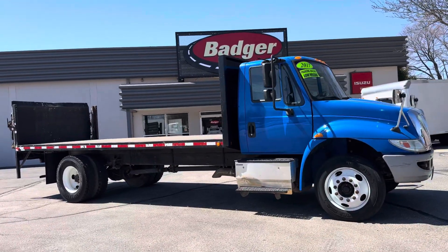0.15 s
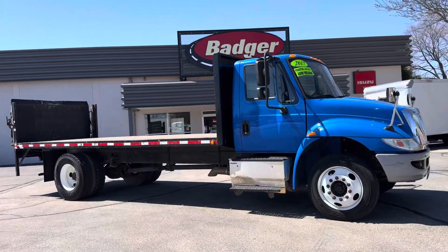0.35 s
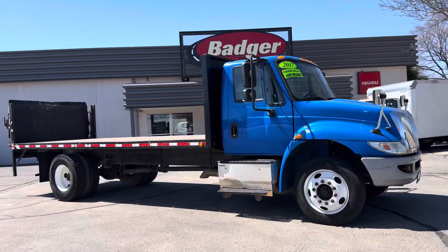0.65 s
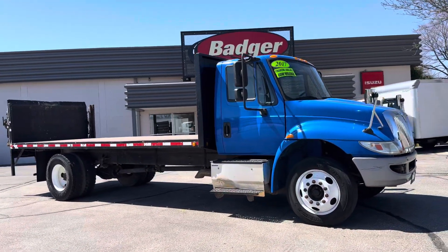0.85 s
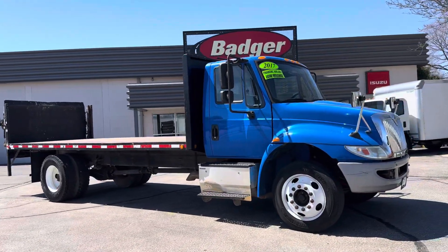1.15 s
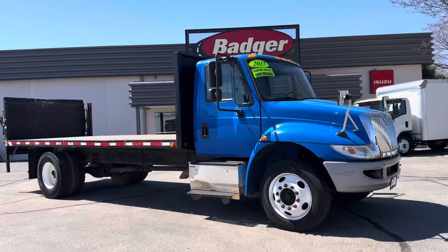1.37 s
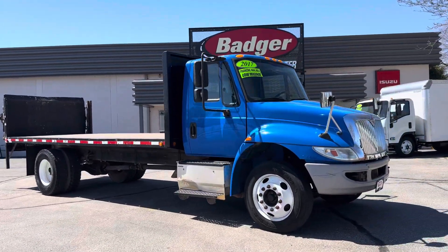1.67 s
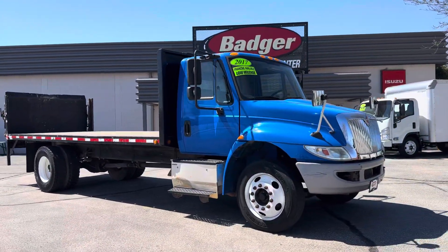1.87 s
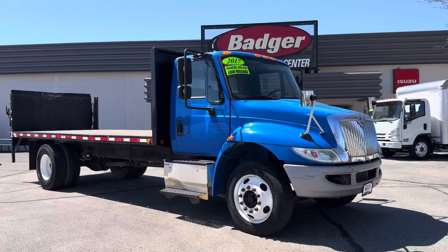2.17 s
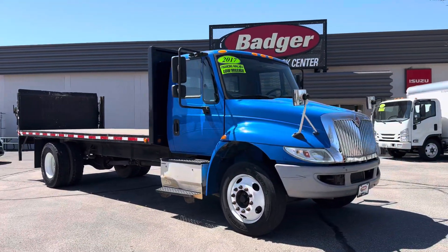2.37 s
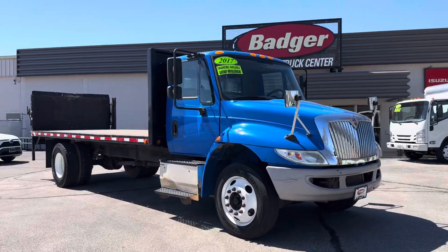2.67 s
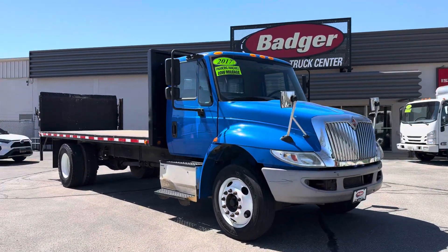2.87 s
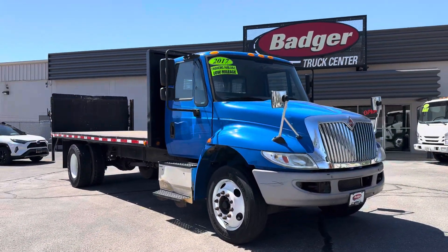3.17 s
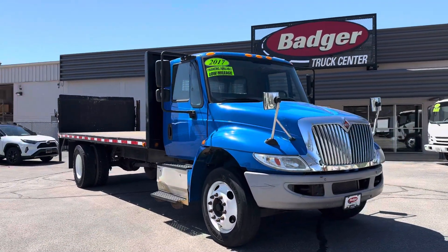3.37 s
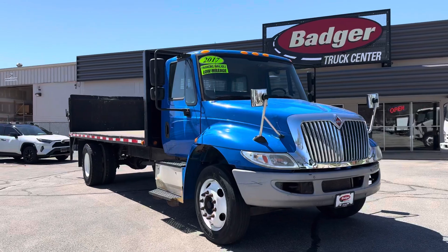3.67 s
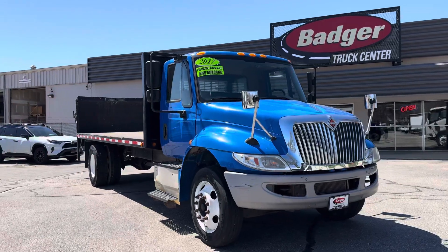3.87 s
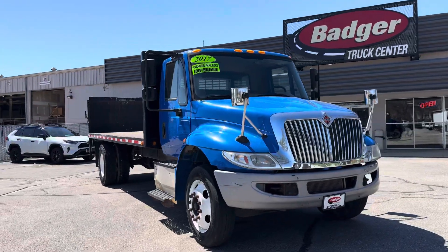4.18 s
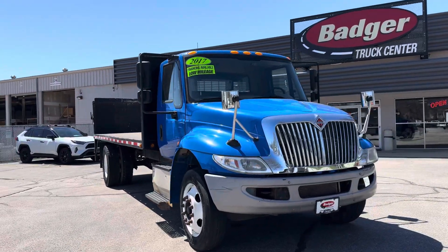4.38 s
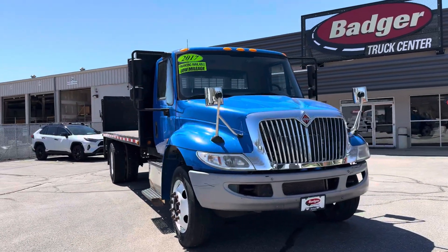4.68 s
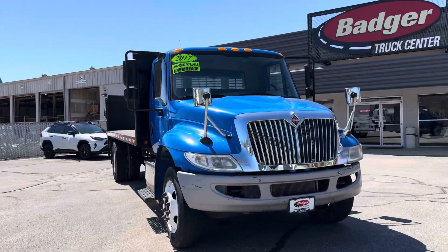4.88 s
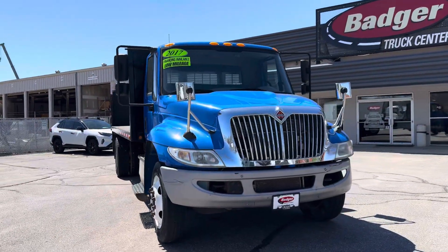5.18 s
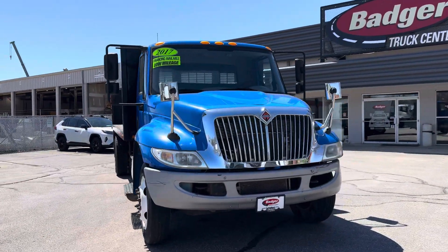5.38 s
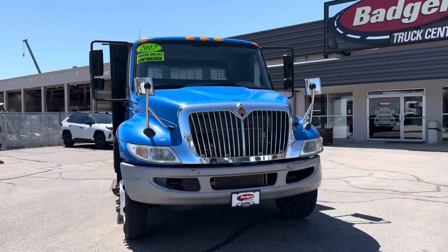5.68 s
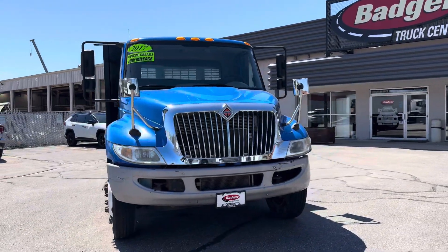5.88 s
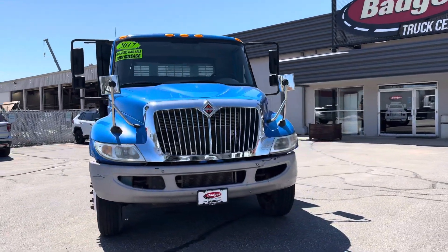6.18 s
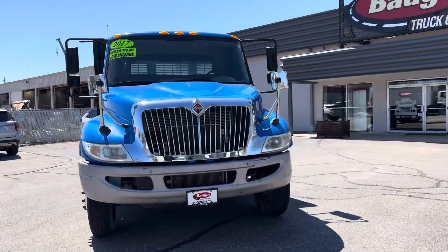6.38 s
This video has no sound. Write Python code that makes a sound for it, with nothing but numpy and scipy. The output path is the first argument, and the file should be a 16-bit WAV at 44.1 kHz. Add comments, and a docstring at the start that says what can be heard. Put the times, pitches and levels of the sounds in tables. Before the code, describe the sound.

A heavy six-cylinder diesel idles at a constant slow speed on an open paved lot. Fast uneven clatter, ringing metal knocks and a steady airy rush run throughout. A handheld phone moves from beside the cab to the grille, so the engine grows louder and brighter. Wind rumbles and thumps on the microphone, strongest between one and two seconds, then mostly eases.

```python
"""Idling diesel truck, walked round by hand

A six-cylinder diesel truck idles on an open lot while a hand-held phone walks from beside the cab to the grille.
Each firing rings decaying modes of the block and sets off bursts of shaped noise, the clatter; air rushes on.
One cylinder adds a heavy hollow knock of two rings; gears whine as thin sines and a low sine with its octave hums.
Wind is coloured noise that rumbles and rustles; buffets are short low swings on the phone's two microphone ports.
"""
import sys
import numpy as np
from scipy import signal
from scipy.fft import rfft, irfft
from scipy.io import wavfile
from scipy.ndimage import uniform_filter1d

SR = 44100
rng = np.random.default_rng(int(sys.argv[2]) if len(sys.argv) > 2 else 0)


def store_wav(level_fs):
    """Save 16-bit WAV to argv[1]."""
    pcm = np.round(np.clip(np.atleast_2d(level_fs), -1, 1) * 32767)
    wavfile.write(sys.argv[1], SR, pcm.T.astype(np.int16))


N = 288414
T = np.arange(N) / SR
FREQ = np.maximum(np.fft.rfftfreq(N, 1 / SR), 1)


def undb(db):
    """Turn dB into gain."""
    return 10 ** (np.asarray(db) / 20)


def level(x, db):
    """Set the rms level."""
    return x * undb(db) / np.sqrt(np.mean(x ** 2))


def curves(table):
    """Join each column of a timed table into one value a sample."""
    s, *columns = np.transpose(table)
    return [np.interp(T, s, column) for column in columns]


def over_hz(hz, values):
    """Join values along a log-frequency axis."""
    return np.interp(np.log(FREQ), np.log(hz), values)


def colour(x, spectrum):
    """Filter by points of frequency and dB."""
    return irfft(rfft(x) * undb(over_hz(*np.transpose(spectrum))), N)


def ring(x, hz, t60):
    """Excite one mode, a complex resonator that falls 60 dB in t60 seconds."""
    pole = np.exp(2j * np.pi * hz / SR - np.log(1000) / (t60 * SR))
    return signal.lfilter([1], [1, -pole], x)


def walk(rate):
    """Hold random levels for 1 / rate s and slew them twice; their spread is near 0.5."""
    k = int(SR / rate)
    held = np.repeat(rng.standard_normal(N // k + 1), k)
    return 0.7 * uniform_filter1d(uniform_filter1d(held, k), k)[:N]


# when the phone is beside the cab, at the front corner and facing the grille: [s]
VIEW_S = (0.35, 3.7, 6.15)


def along_walk(values):
    """Glide between the values for the three places of the phone."""
    return np.interp(T, VIEW_S, values)


CYCLE_HZ = 6.26  # all six cylinders fire once (about 750 rpm)
# the blows arrive sooner as the phone nears the engine: lead_s at each of the three places
FIRING_LEAD_S = (0.001946, 0.002528, .003)


def firings():
    """Count evenly spaced firings: number of each, its cylinder, and the seconds since it began."""
    firing_hz = CYCLE_HZ * 6
    firing = (T + along_walk(FIRING_LEAD_S)) * firing_hz
    number = firing.astype(int)
    return number, number % 6, firing % 1 / firing_hz


# modes of block and panels: pitch_hz, t60_s, then level_db for each of the six cylinders in firing order
BLOCK_MODES = [(320.6, 0.29, -22.5, -27, -3.5, -12, -20.5, -1),
               (679.6, 0.12, -9.5, -12.5, -10, -9.5, -7.5, -10.5),
               (825.2, 0.078, 0.5, 5, 7.5, 1, -15.5, 6.5), (892.5, 0.1, -10.5, -0.5, -19.5, -4.5, -7.5, -8),
               (1267.4, 0.06, -16, -6.5, -6, -2, 1, -6), (1389, 0.065, -10, -17, -14, 3.5, -4, -1),
               (1470, 0.057, -1, -11, -13, -8, -5, 3.5), (1540, 0.044, -0.5, -16, -14, -9, -10, -2.5),
               (1828, 0.052, -6.5, -15.5, -14, -14, -11, -6.5),
               (2058, 0.07, 0.5, -4.5, -25, 4, -11.5, -15.5), (2136, 0.03, -2, 6.5, -33, -16.5, 0, -13),
               (2245, 0.013, -9, 3, -29, 8, -16, 5), (2655, 0.029, -1.5, -2.5, -3.5, -3.5, 2, -7.5),
               (2808, 0.017, -0.5, 3, -10, -1, -5.5, 3.5),
               (3346, 0.0078, -19.5, -24, -15.5, -11.5, -21.5, -20.5),
               (4336, 0.025, -25.5, -13.5, -17.5, -18, -20, -12.5),
               (4670, 0.044, -16.5, -11.5, -14, -21.5, -22.5, -14.5),
               (4750, 0.048, -15.5, -10, -13, -21.5, -15, -14),
               (6355, 0.011, -12.5, -20.5, -17, -14.5, -21, -19)]
# the last cylinder's blow as heard on the walk: level_db at each of the three places
LAST_CYLINDER_VIEW_DB = (1, -2, 0.5)
# knocks against the rest of the engine: level_db at each of the three places
KNOCK_VIEW_DB = (-3, -2, -2.5)
KNOCK_RISE_S = 0.022  # t60 of the push that excites each mode
KNOCK_SCATTER_DB, KNOCK_SMEAR = 1.2, 0.22  # shot-to-shot spread of level, and of phase in rad
KNOCK_DETUNE = 0.004  # share of pitch each shot strays, up to 2 kHz; thin high parts stray more
PATH_DRIFT_DB = -0.6  # depth of the slow swell and fade of each mode as the listener changes place
GROUND_ECHO_S, GROUND_ECHO_DB = 0.0055, -6
KNOCK_DB, RATTLE_DB = -35.5, -46  # balance within the engine


def knocks_and_rattle():
    """Firings knock the block's modes; noise keeps loose parts murmuring on the same modes between firings."""
    number, cylinder, since = firings()
    start = np.diff(number, prepend=-1) > 0
    start = start * undb((cylinder == 5) * along_walk(LAST_CYLINDER_VIEW_DB))
    knock = rattle = 0
    for hz, t60, *db in BLOCK_MODES:
        # each cylinder reaches the mode by its own path; combustion varies from shot to shot
        path = np.exp(2j * np.pi * rng.random(6))
        size, turn, stray = rng.standard_normal((number[-1] + 1, 3)).T
        shot = undb(KNOCK_SCATTER_DB * size) * np.exp(1j * KNOCK_SMEAR * turn)
        hit = start * shot[number] * (path * undb(db))[cylinder]
        blow = ring(hit, hz, KNOCK_RISE_S)  # pressure builds, no click
        stray_hz = KNOCK_DETUNE * max(hz / 2000, 1) ** 2 * hz * stray[number]
        detune = np.exp(2j * np.pi * stray_hz * since)
        drift = undb(PATH_DRIFT_DB * walk(0.62))
        knock = knock + drift * (ring(blow, hz, t60) * detune).imag
        murmur = ring(rng.standard_normal(N), hz, t60).imag
        rattle = rattle + drift * undb(np.mean(db)) * murmur
    echo = np.interp(T - GROUND_ECHO_S, T, knock)  # again via the asphalt
    knock = knock + undb(GROUND_ECHO_DB) * echo
    return undb(along_walk(KNOCK_VIEW_DB)) * level(knock, KNOCK_DB) + level(rattle, RATTLE_DB)


def shot_levels(cylinder_db, scatter_db):
    """Give each firing its cylinder's gain and a random scatter."""
    number, cylinder, _ = firings()
    scatter = undb(scatter_db * rng.standard_normal(number[-1] + 1))
    return undb(cylinder_db)[cylinder] * scatter[number]


# valve and injector clatter, relative noise spectrum: frequency_hz, density_db
CLATTER_SPECTRUM = [(200, -16.5), (400, -3), (570, -8.5), (800, -3), (1400, -8.5), (2200, -11),
                    (2900, -17.5), (3650, -26), (4700, -14), (5600, -25), (6500, -31.5), (9000, -29),
                    (11500, -25), (15000, -27.5)]
# clatter below the valve train, in firing order: level_db
CLATTER_CYLINDER_DB = [2, 5, 4.5, 2, 1.5, 5.5]
# valve train above the knocks, with quieter cylinders, in firing order: level_db
VALVE_CYLINDER_DB = [0, 2.5, 2, -6, -2, 4]
# injector ticks in the far treble, in firing order: level_db
TICK_CYLINDER_DB = [0.5, -0.5, 3.5, -3, -6.5, 1]
VALVE_FROM_HZ, TICK_FROM_HZ = 3500, 9000
CLATTER_DECAY_S, TICK_DECAY_S = 0.026, 0.014  # time constants
VALVE_RISE_S = 0.007  # time scale of the build and the fade
VALVE_DB, TICK_DB = -4, 1  # against the low clatter, before colouring
CLATTER_DB = -37  # balance within the engine


def clatter():
    """Each firing opens noise in three bands: low clatter and ticks fade, the valve train builds for a moment."""
    _, _, since = firings()
    burst = shot_levels(CLATTER_CYLINDER_DB, 0.34) * np.exp(-since / CLATTER_DECAY_S)
    burst = uniform_filter1d(burst, size=330)
    tick = undb(TICK_DB) * shot_levels(TICK_CYLINDER_DB, 1.5) * np.exp(-since / TICK_DECAY_S)
    tick = uniform_filter1d(tick, size=300)
    u = since / VALVE_RISE_S
    valve = undb(VALVE_DB) * shot_levels(VALVE_CYLINDER_DB, 2.03) * (0.13 + u) * np.exp(0.65 - u)
    valve = uniform_filter1d(valve, size=100)
    low, high = FREQ < VALVE_FROM_HZ, FREQ > TICK_FROM_HZ
    noise = rfft(burst * rng.standard_normal(N)) * low
    noise = noise + rfft(valve * rng.standard_normal(N)) * ~(low | high)
    noise = noise + rfft(tick * rng.standard_normal(N)) * high
    return level(colour(irfft(noise, N), CLATTER_SPECTRUM), CLATTER_DB)


# rush against the clatter spectrum: frequency_hz, level_db
RUSH_TILT = [(900, 2.5), (2100, -2), (4500, -8), (12000, -5)]
RUSH_DB = -34.5  # balance within the engine


def rush():
    """Fan and intake air is steady turbulence: noise with a slight waver."""
    air = undb(0.16 * walk(5.3)) * rng.standard_normal(N)
    return level(colour(colour(air, CLATTER_SPECTRUM), RUSH_TILT), RUSH_DB)


def engine():
    """Sum the struck metal, the clatter and the moving air."""
    return knocks_and_rattle() + clatter() + rush()


# engine by region: low_hz, high_hz, then level_db before the ports beside the cab, at the corner, at the grille
VIEWS = [(341, 547, -48.5, -38, -34.5), (645, 1065, -42, -39.5, -39.5), (1100, 1325, -44, -38.5, -37),
         (1358, 1790, -49, -40.5, -39.5), (1710, 2270, -44.5, -39.5, -39), (2300, 4270, -45, -42, -42.5),
         (3340, 4340, -52.5, -48, -45.5), (4160, 5300, -50.5, -46, -42.5), (5380, 7740, -51, -45.5, -45.5),
         (11640, 13700, -56, -52.5, -49)]
REGION_FLICKER_DB, REGION_GRAIN_DB = 1.02, 1.2  # depth of slower and quicker unevenness, own to each region


def walked(x):
    """Cab, wheel arch and grille let different regions through as the listener moves round."""
    spectrum, out = rfft(x), 0
    centres = [np.sqrt(low * high) for low, high, *_ in VIEWS]
    for (low, high, *db), one in zip(VIEWS, np.eye(len(centres))):
        inside = np.std(irfft(spectrum * (FREQ > low) * (FREQ < high), N))
        region_db = along_walk(db) + REGION_FLICKER_DB * walk(10) + REGION_GRAIN_DB * walk(50)
        region = irfft(spectrum * over_hz(centres, one), N)  # overlaps its neighbours
        out = out + undb(region_db) / inside * region
    return out


# heavy knock of the last cylinder: time_s, level_db, pitch_hz
HEAVY_KNOCK = [(0.0, -35, 1350), (1.2, -36.5, 1410), (1.75, -24.5, 1300), (2.2, -26.5, 1374),
               (2.7, -30.5, 1400), (3.0, -28.5, 1530), (3.9, -28.5, 1460), (4.4, -25, 1390),
               (5.0, -26, 1470), (5.3, -27.5, 1364), (5.7, -22, 1410), (5.95, -19.5, 1390),
               (6.54, -23, 1397)]
# the lower ring against the upper: level_db at each of the three places
HEAVY_LOWER_DB = (-3.5, -4, 1)
HEAVY_RISE_S, HEAVY_SPLIT_HZ = 0.0046, 90  # rings lie this far above and below the pitch
HEAVY_SCATTER_DB, HEAVY_STRAY = 0.5, 0.01  # shot to shot; stray is a share of pitch


def heavy_knock():
    """Once a cycle one short, hollow double ring stands out; its pitch strays a little."""
    number, cylinder, since = firings()
    db, hz = curves(HEAVY_KNOCK)
    size, stray, turn = rng.standard_normal((number[-1] + 1, 3)).T
    u = since / HEAVY_RISE_S
    shape = (cylinder == 5) * (u * np.exp(1 - u)) ** 2
    turns = hz * (1 + HEAVY_STRAY * stray[number]) * since + turn[number]
    upper = np.sin(2 * np.pi * (turns + HEAVY_SPLIT_HZ * since))
    lower = np.sin(2 * np.pi * (turns - HEAVY_SPLIT_HZ * (since - HEAVY_RISE_S)))
    swing = upper + undb(along_walk(HEAVY_LOWER_DB)) * lower
    return undb(db + HEAVY_SCATTER_DB * size[number]) * shape * swing / np.sqrt(2)


# gear and pump tones: pitch_hz, then rms level_db at each of the times below
WHINES = [(306, -48, -52, -44.5, -51, -50.5), (679.4, -59, -54.5, -61, -48, -57),
          (801, -52.5, -46.5, -65, -61.5, -44.5), (827.4, -55.5, -57, -53.5, -53, -43),
          (903, -47, -51, -58.5, -48, -43.5), (1234, -52.5, -52, -52.5, -44, -48.5),
          (1299, -52.5, -52.5, -62.5, -42, -57.5), (1838, -53, -58, -60, -47, -56.5),
          (2085, -59.5, -56.5, -46.5, -67, -65), (3400, -69.5, -62, -70, -63, -70)]
# times of the whine levels: [s]
WHINE_S = (.5, 1.6, 3.1, 4.4, 5.8)
WHINE_WAVER_DB, WHINE_WANDER_TURNS = 1.5, 0.16  # depths of level and phase wander


def whines():
    """Thin sine tones of gears and pumps come and go with the listener's place."""
    out = 0
    for hz, *db in WHINES:
        tone_db = np.interp(T, WHINE_S, db) + WHINE_WAVER_DB * walk(4.3)
        turns = hz * T + WHINE_WANDER_TURNS * walk(3.135) + rng.random()
        out = out + np.sqrt(2) * undb(tone_db) * np.sin(2 * np.pi * turns)
    return out


# low drone: time_s, rms level_db
HUM = [(0.0, -25.5), (0.33, -23.5), (0.38, -25.5), (0.54, -22), (1.07, -22), (1.11, -33.5), (1.15, -21),
       (1.42, -20.5), (1.51, -29.5), (2.13, -19.5), (2.26, -43.5), (2.33, -29.5), (2.39, -36.5),
       (2.88, -29.5), (2.93, -35.5), (3.11, -27.5), (3.35, -38), (3.48, -23.5), (3.57, -27), (3.7, -20),
       (3.77, -27), (3.86, -16.5), (3.93, -24.5), (4.0, -23.5), (4.08, -17.5), (4.15, -31), (4.43, -33),
       (4.48, -26.5), (4.86, -36.5), (4.97, -27.5), (5.01, -34.5), (5.57, -31.5), (5.79, -43.5),
       (5.81, -26.5), (6.03, -26.5), (6.08, -44.5), (6.21, -27.5), (6.25, -39), (6.43, -34.5),
       (6.54, -44.5)]
HUM_HZ, HUM_OCTAVE_DB = 124.6, -19.5
HUM_WAVER_DB, HUM_ROUGH_DB = 2, 1  # depths of slower and quicker level changes
HUM_WANDER_TURNS, HUM_FLUTTER_TURNS = 0.21, 0.09  # depths of slower and quicker phase wander


def hum():
    """A low tone with a faint octave wanders in pitch and wavers in level."""
    turns = HUM_HZ * T + HUM_WANDER_TURNS * walk(8) + HUM_FLUTTER_TURNS * walk(30) + rng.random()
    octave = np.sin(2 * 2 * np.pi * turns)
    tone = np.sin(2 * np.pi * turns) + undb(HUM_OCTAVE_DB) * octave
    tone_db = curves(HUM)[0] + HUM_WAVER_DB * walk(18) + HUM_ROUGH_DB * walk(45)
    return np.sqrt(2) * undb(tone_db) * tone


# wind on the ports: time_s, rumble level_db, flutter level_db
WIND = [(0.0, -27, -32), (0.49, -22, -27), (0.67, -28.5, -31), (0.71, -21, -25.5), (0.76, -26.5, -31),
        (0.89, -23, -28.5), (0.91, -24, -20), (0.95, -22.5, -26), (1.02, -24.5, -30.5), (1.04, -26, -26.5),
        (1.22, -18.5, -32.5), (1.29, -23, -30), (1.42, -19.5, -28), (1.46, -28.5, -32.5), (1.53, -23, -28),
        (1.58, -29, -35), (1.62, -26, -24.5), (1.66, -17.5, -20.5), (1.71, -22.5, -32.5), (1.75, -19, -12),
        (1.8, -21, -30.5), (1.86, -16, -20.5), (1.89, -16.5, -34.5), (1.93, -27.5, -33), (1.97, -21.5, -26),
        (2.04, -29, -25), (2.07, -15.5, -22), (2.22, -29.5, -30.5), (2.37, -25, -36.5),
        (2.46, -42.5, -33.5), (2.51, -31.5, -24), (2.55, -29.5, -35.5), (2.86, -28, -26.5),
        (3.2, -32.5, -37.5), (3.99, -30.5, -28), (4.1, -21.5, -27), (4.21, -31.5, -28.5),
        (4.48, -29.5, -36), (4.63, -25.5, -28.5), (4.66, -42.5, -28.5), (4.81, -23.5, -26.5),
        (4.84, -36, -30), (4.94, -30.5, -26), (4.97, -26, -34.5), (5.15, -40, -32.5), (5.28, -30, -35.5),
        (5.48, -30.5, -30), (6.14, -29.5, -30), (6.17, -27.5, -28.5), (6.52, -25.5, -29), (6.54, -18, -25)]
# four relative noise spectra of the wind, lowest layer first: frequency_hz, density_db
DEEP = [(20, -33), (35, -14), (50, -3), (65, 2), (85, -9.5), (150, -59), (300, -110)]
RUMBLE = [(25, -28), (40, -15), (55, 4.5), (100, 10), (150, 2), (220, -18), (300, -49), (600, -110)]
FLUTTER = [(60, -51), (100, -28), (140, 6.5), (200, 0), (280, -4.5), (350, -21), (700, -110)]
RUSTLE = [(100, -69.5), (200, -8), (280, 3), (450, -6.5), (580, -16), (800, -26), (1500, -110)]
CALM_DB = -31.5  # rumble or flutter level at which deep and rustle have their own calm levels
DEEP_CALM_DB, DEEP_FOLLOW = -47, 2.04  # follow: dB per dB of rumble
RUSTLE_CALM_DB, RUSTLE_FOLLOW = -37.5, 0.33  # follow: dB per dB of flutter
WIND_LUMP_DB, WIND_FLICKER_DB = 2.5, 1  # depths, shared by all layers and own to each


def wind():
    """Turbulence as noise: a deep thud follows the rumble, a thin rustle the flutter; all lumpy and flickering."""
    rumble_db, flutter_db = curves(WIND)
    deep_db = DEEP_CALM_DB + DEEP_FOLLOW * (rumble_db - CALM_DB)
    rustle_db = RUSTLE_CALM_DB + RUSTLE_FOLLOW * (flutter_db - CALM_DB)
    layers = ((rumble_db, RUMBLE), (deep_db, DEEP), (flutter_db, FLUTTER), (rustle_db, RUSTLE))
    lumps = walk(16)
    out = 0
    for db, spectrum in layers:
        gain = undb(db + WIND_LUMP_DB * lumps + WIND_FLICKER_DB * walk(25))
        out = out + gain * level(colour(rng.standard_normal(N), spectrum), 0)
    return out


# single buffets: start_s, level_db before the common gain, pitch_hz
BUFFETS = [(0.386, -20, 156), (0.7, -20.5, 143.8), (0.915, -13, 170), (1.025, -14.5, 144.6),
           (1.143, -15, 146.6), (1.403, -10.5, 142), (1.506, -22, 202), (1.654, -10.5, 171.9),
           (1.734, -14.5, 186), (1.827, -8.5, 163.7), (1.86, -10.5, 172), (2.047, -12.5, 146.5),
           (2.147, -13.5, 155.5), (2.238, -15.5, 346), (2.259, -17, 440), (2.774, -23.5, 110),
           (2.832, -19.5, 136.5), (1.2, -21, 79.9), (1.315, -13.5, 111.1), (4.062, -16, 140.7),
           (4.096, -11.5, 279.5), (4.79, -17, 170), (4.967, -16, 119.3), (6.173, -14, 190),
           (6.186, -18.5, 200), (6.425, -18, 167)]
BUFFET_TURNS, BUFFET_DB = 0.69, 2  # swings up to the peak; common gain
BUFFET_WAKE_S, BUFFET_WAKE_DB = 0.016, -17  # time to the wake's peak; level against the table
WAKE_DB_PER_OCTAVE = 1.5  # quicker eddies rustle more, against 200 Hz


def buffets():
    """Each eddy that breaks on a port gives a few quick swings and leaves a rustling wake."""
    out, wake = np.zeros(N), np.zeros(N)
    for (s, db, hz), turn in zip(BUFFETS, rng.random(len(BUFFETS))):
        u = np.clip((T - s) * hz / BUFFET_TURNS, 0, 50)
        swing = np.sin(2 * np.pi * (hz * T + turn))
        out += undb(db + BUFFET_DB) * u * np.exp(1 - u) * swing
        v = np.clip((T - s) / BUFFET_WAKE_S, 0, 50)
        wake_db = db + BUFFET_WAKE_DB + WAKE_DB_PER_OCTAVE * np.log2(hz / 200)
        wake += undb(wake_db) * v * np.exp(1 - v)
    return out + wake * level(colour(rng.standard_normal(N), RUSTLE), 0)


def sound_field():
    """Sum the truck and the wind as they reach the phone, as a spectrum."""
    return rfft(walked(engine()) + heavy_knock() + whines() + hum() + wind() + buffets())


# the two ports as sum and difference: frequency_hz, sum_db, difference_db
PORTS = [(30, 2.5, -4.5), (118, -0.5, -12), (249, 0, -10), (540, 1, -2), (728, 3.5, 3), (1005, -2, -11),
         (1630, 1.5, 0.5), (1920, 1, -6), (2750, 0, -5), (5310, -11, -12.5), (6580, -6.5, -8),
         (8100, -15, -4.5), (9870, -50, -12.5), (11850, -14, -12.5), (15200, -7.5, -15)]
# how the difference follows the sum: frequency_hz, likeness (0-1), phase_lead_rad
PORT_LINK = [(50, .55, -1.35), (200, .6, -1.35), (400, .7, -1.3), (560, .75, -1.8), (700, .82, -3),
             (950, .7, -3.1), (1400, .83, -2.5), (2000, .84, -3.2), (2700, .72, -4), (3500, .45, -4.8),
             (6000, .3, -4.9), (12800, .6, -4.7)]


def scene():
    """The ports share part of the field with a phase shift; the rest reaches them unrelated."""
    field, other = sound_field(), sound_field()
    hz, sum_db, diff_db = np.transpose(PORTS)
    link_hz, like, lead = np.transpose(PORT_LINK)
    like, lead = over_hz(link_hz, like), over_hz(link_hz, lead)
    mid = irfft(undb(over_hz(hz, sum_db)) * field, N)
    linked = like * np.exp(1j * lead) * field
    unrelated = np.sqrt(1 - like ** 2) * other
    side = irfft(undb(over_hz(hz, diff_db)) * (linked + unrelated), N)
    return np.array([mid + side, mid - side])


TOP_HZ = 15750


def record(dry):
    """The phone cuts the top with a steep low-pass."""
    low_pass = signal.ellip(10, 0.2, 80, TOP_HZ, fs=SR, output="sos")
    return signal.sosfilt(low_pass, dry)


dry = scene()
out = record(dry)
store_wav(out)
```